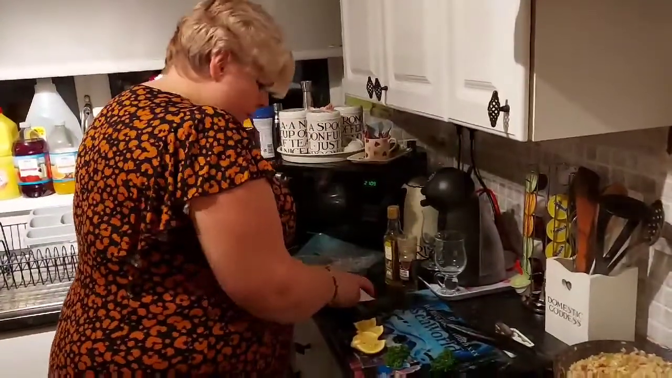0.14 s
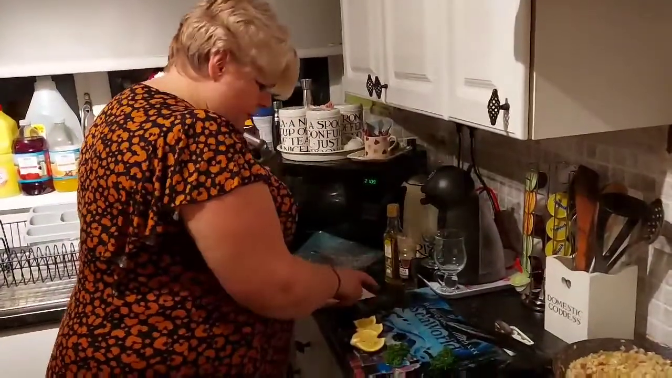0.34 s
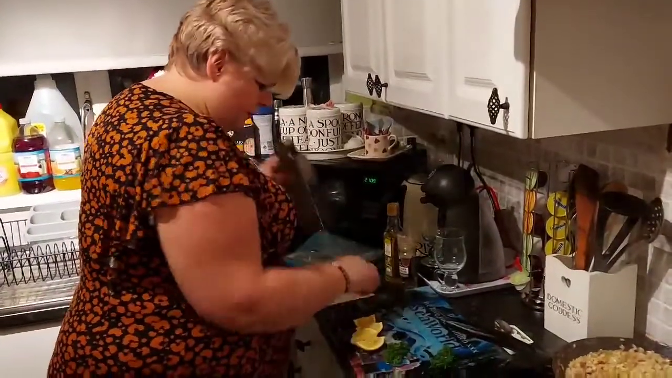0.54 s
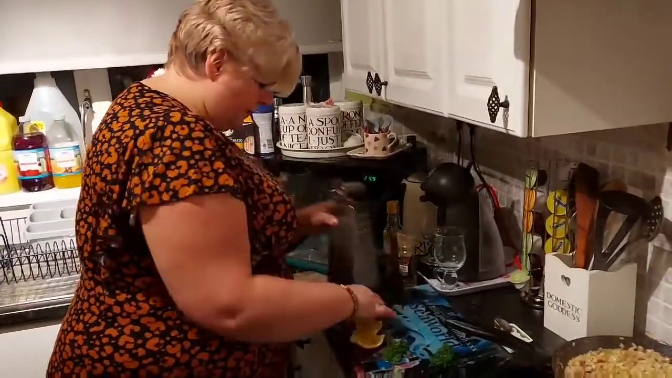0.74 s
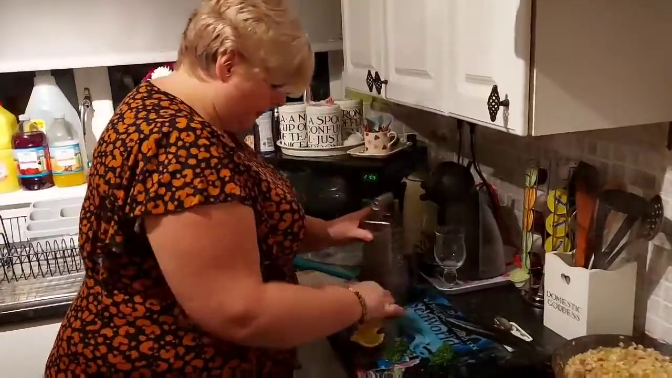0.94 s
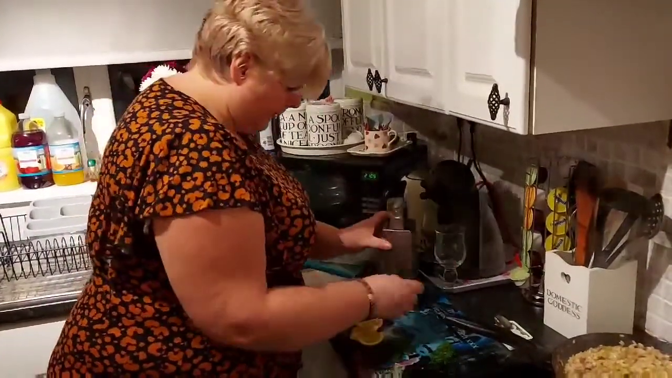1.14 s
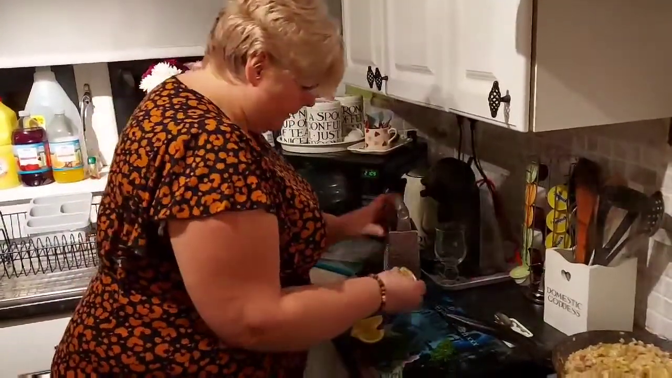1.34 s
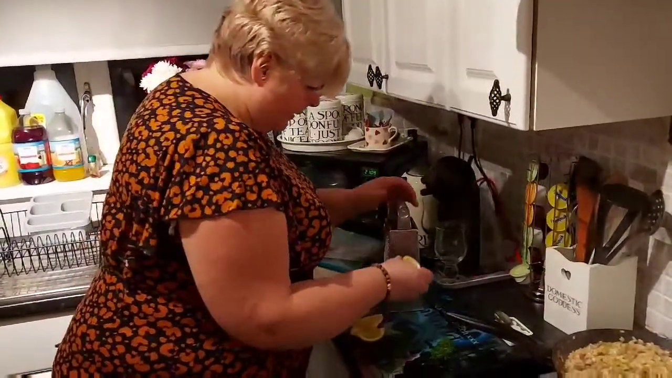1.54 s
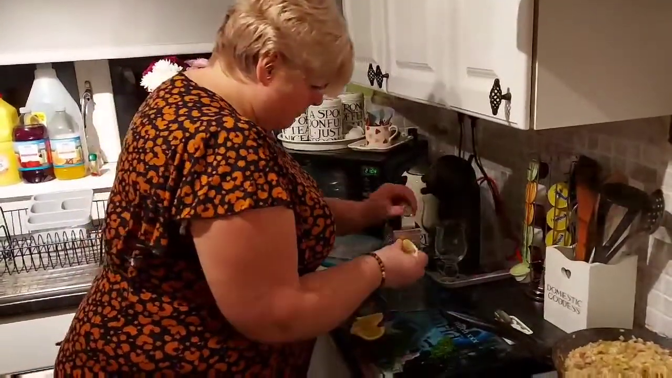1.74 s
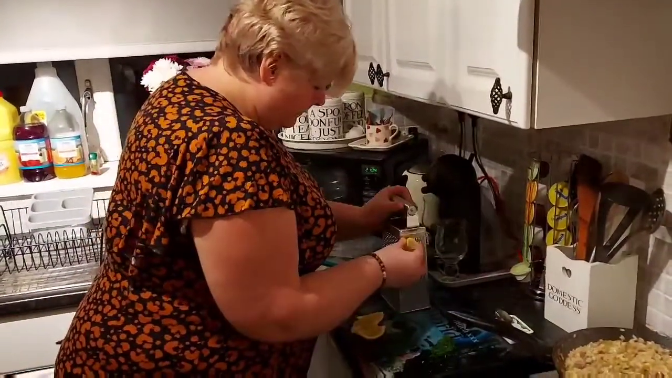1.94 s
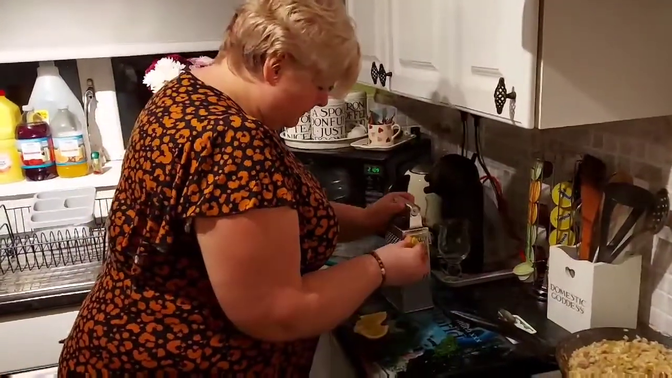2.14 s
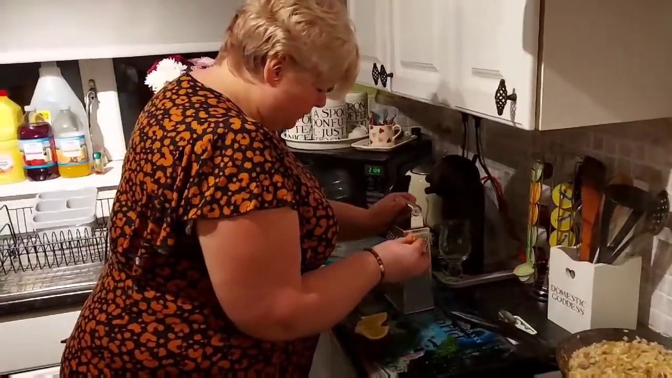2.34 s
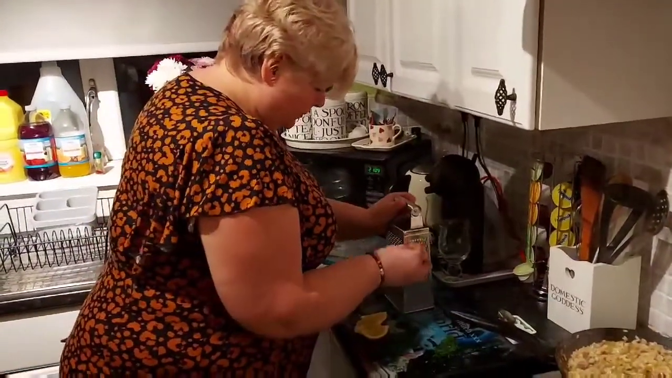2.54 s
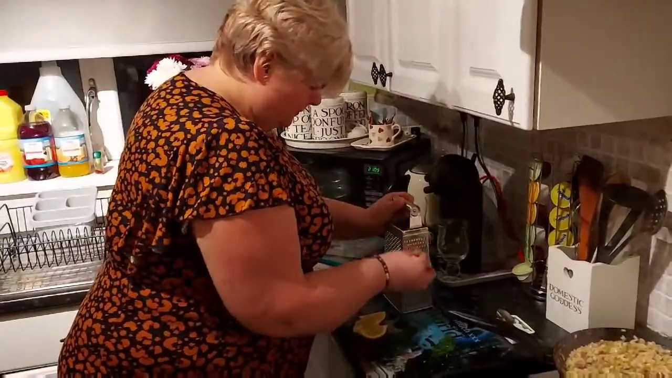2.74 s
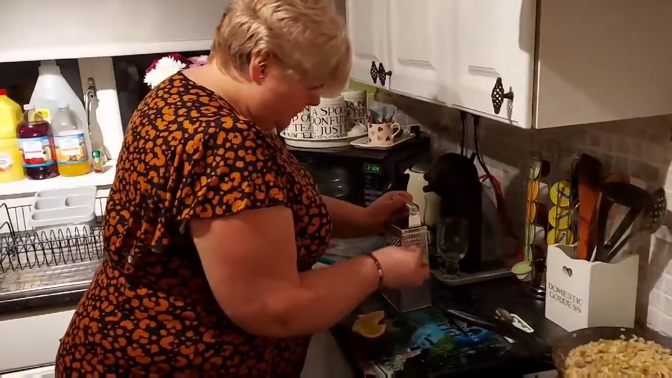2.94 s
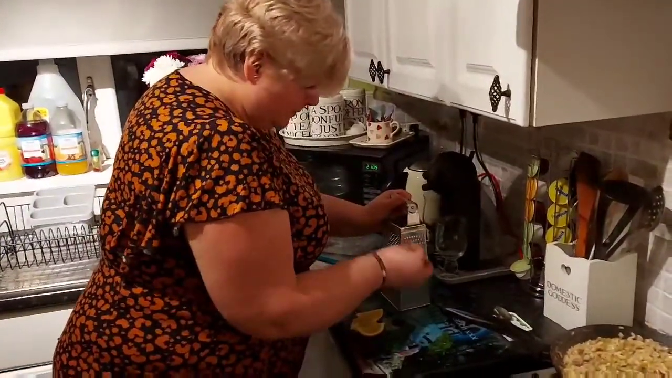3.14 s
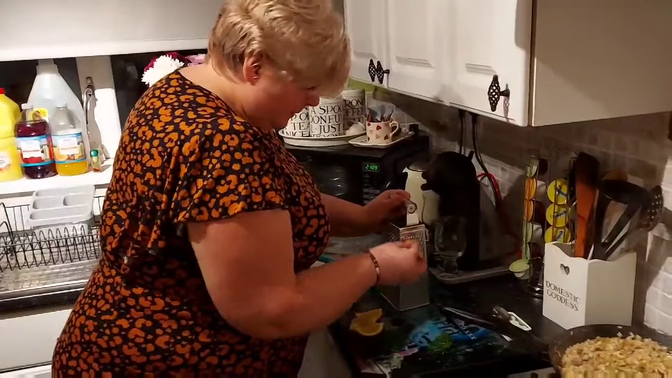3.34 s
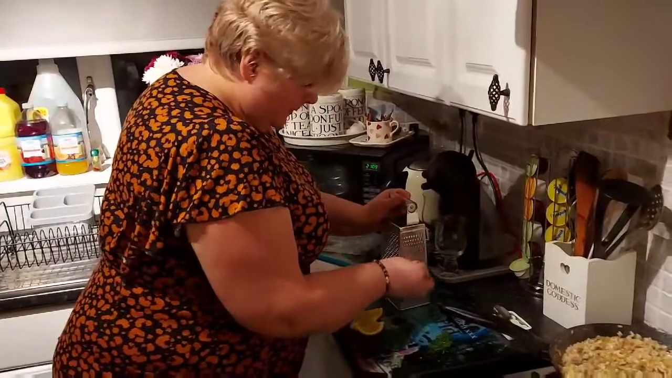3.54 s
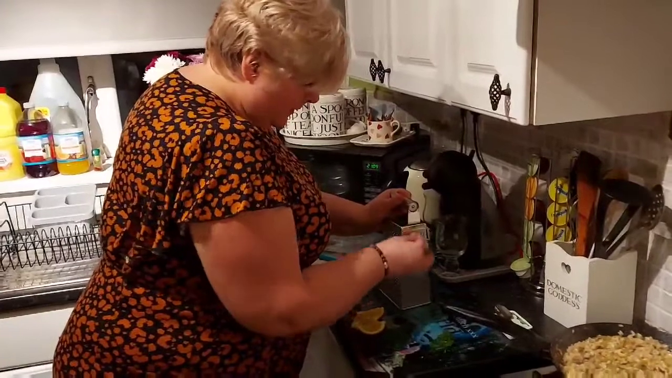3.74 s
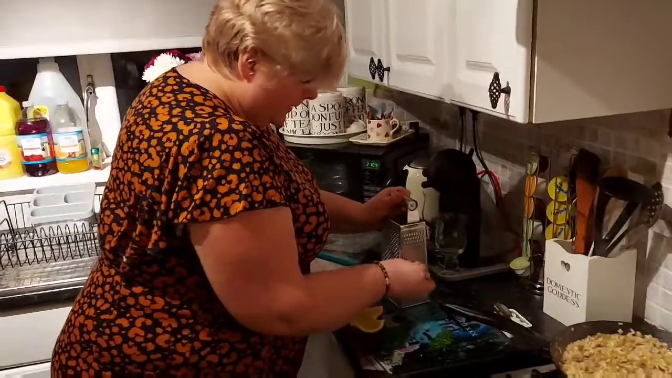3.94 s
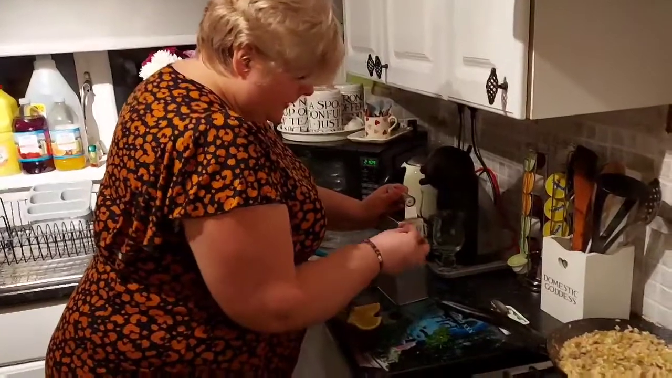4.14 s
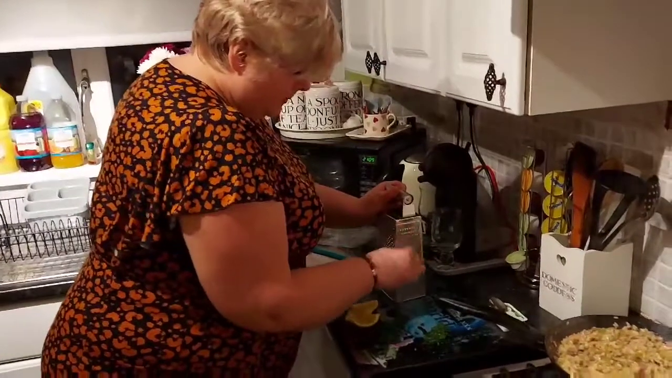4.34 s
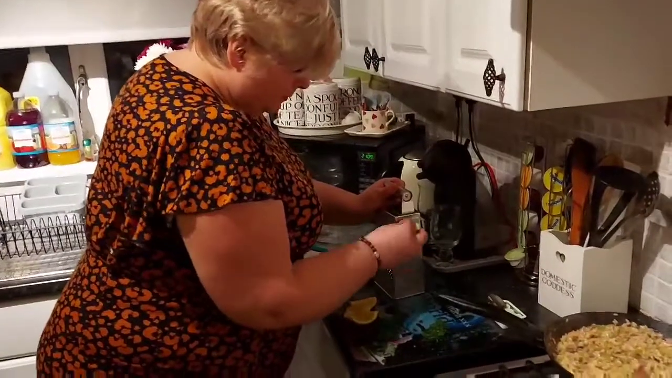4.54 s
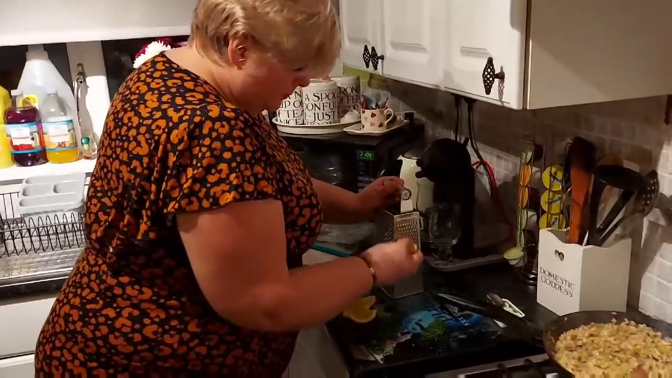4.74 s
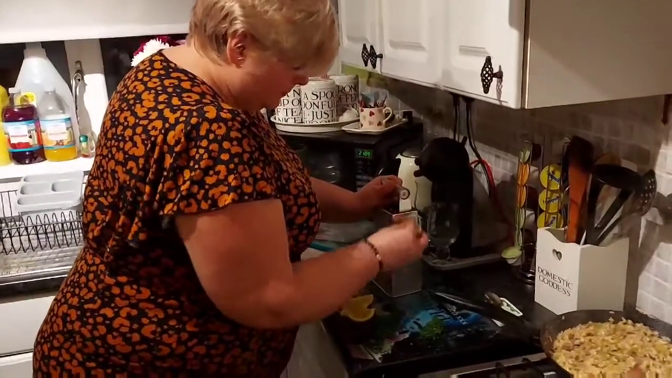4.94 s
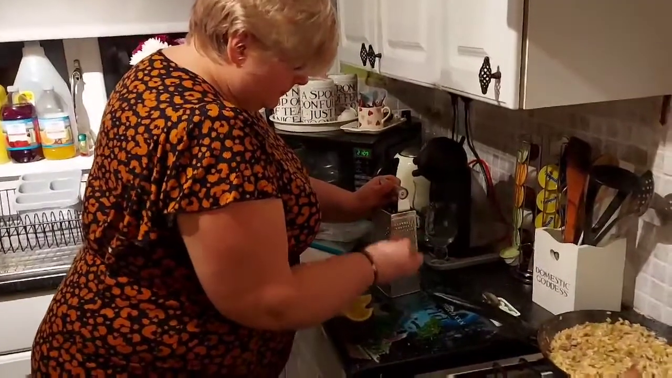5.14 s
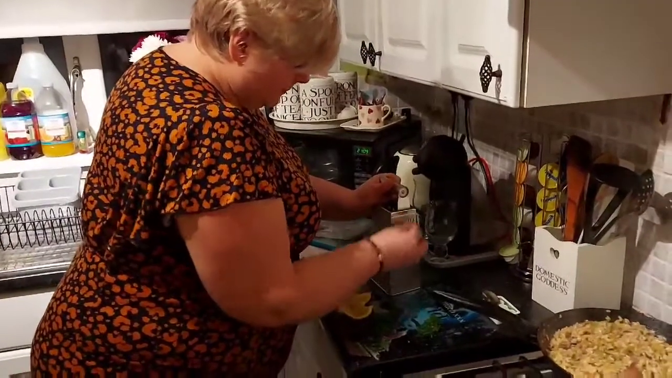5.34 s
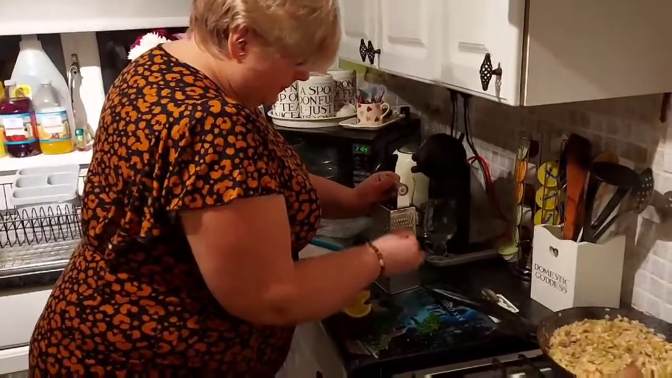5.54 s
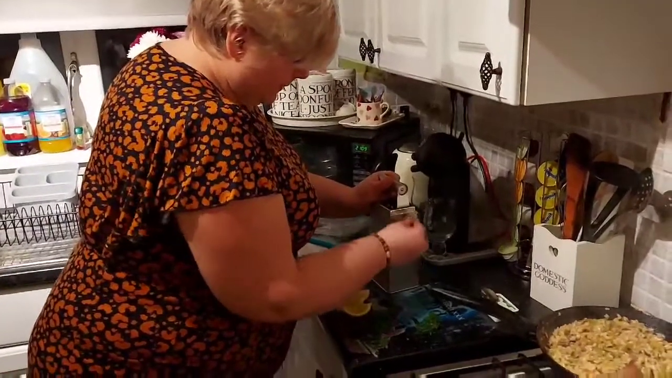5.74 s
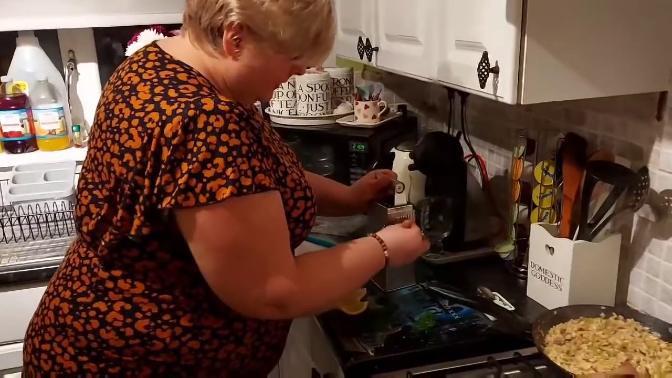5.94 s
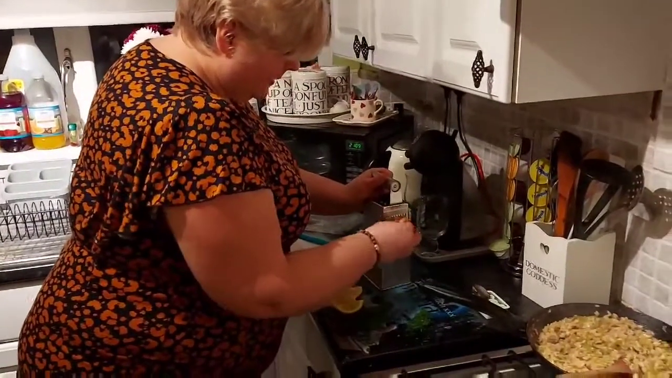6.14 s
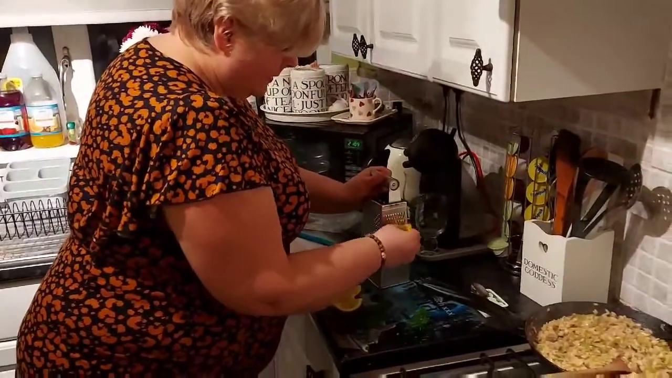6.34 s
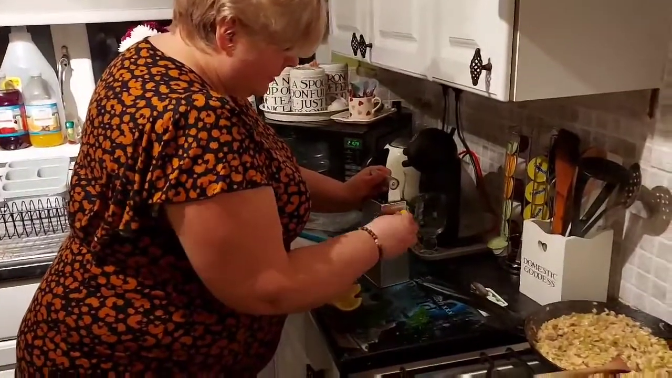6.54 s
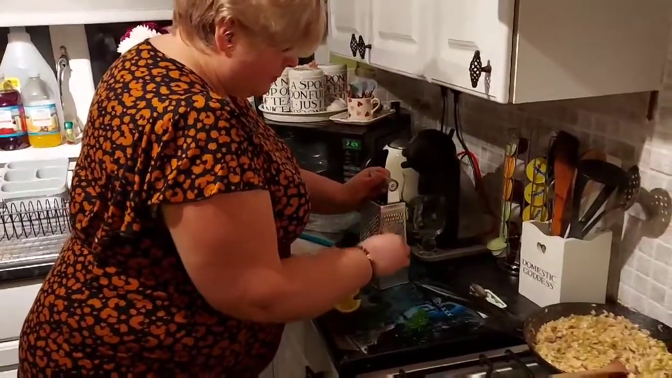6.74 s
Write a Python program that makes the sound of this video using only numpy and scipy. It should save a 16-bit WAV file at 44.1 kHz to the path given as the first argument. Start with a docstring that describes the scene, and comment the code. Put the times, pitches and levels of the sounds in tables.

```python
"""Lemon on a box grater

A steel box grater is stood on a kitchen counter and shuffled into place; a lemon is rubbed down it in eight strokes.
Tearing peel is thousands of tiny random snaps that ring the steel box; rim knocks and drags sound counter and steel.
Light clicks, a dull bump, low noise, a thin high hiss and mains hum surround them.
Sparse reflections and a decaying tail form the small, hard-walled kitchen."""
import sys
import numpy as np
from scipy import signal
from scipy.fft import rfft, irfft
from scipy.io import wavfile

SR = 44100
rng = np.random.default_rng(int(sys.argv[2]) if len(sys.argv) > 2 else 0)


def persist_wave(psi):
    """Save psi, clipped to +-1, as 16-bit WAV."""
    counts = np.round(np.clip(psi, -1, 1) * 32767).astype(np.int16)
    wavfile.write(sys.argv[1], SR, np.atleast_2d(counts).T)


N = 299412
TIME_S = np.arange(N) / SR

# Level columns are relative to each layer's mix gain; spectra are shapes, later normalised.
# Room tail decay: freq_hz, t60_s
ROOM_T60 = [(100, 0.54), (280, 0.42), (600, 0.34), (1400, 0.34), (3700, 0.31), (10000, 0.17)]
# Left-right likeness of the reflections: freq_hz, likeness (-1 to 1)
ROOM_LIKENESS = [(60, 0.72), (280, 0.79), (600, 0.55), (1300, -0.0083), (2800, 0.034), (13000, 0.0078)]
# Straight sound against the reflections: freq_hz, ratio_db
DIRECT_RATIO = [(100, -2.5), (300, -15.5), (700, -11.5), (1500, -12.5), (13000, -12.5)]

# Low room noise spectrum: freq_hz, shape_db
LOW_NOISE_SPECTRUM = [(15, -84), (25, -7), (108, -6), (157, -7.5), (523, -14.5), (781, -12.5), (884, -8),
                      (1000, -29), (1300, -70), (2200, -120)]
# High hiss spectrum: freq_hz, shape_db
HISS_SPECTRUM = [(900, -6), (1150, 4.5), (1450, 10), (1900, 2.5), (3100, 3.5), (3700, 8), (4400, 10),
                 (4900, 4), (5500, 9), (6300, 5), (10500, 6.5), (12000, 7.5), (12500, 13), (13300, -1)]
# High hiss level over time: time_s, relative_level_db
HISS_LEVEL = [(0, -57), (1, -59), (2.3, -58.5), (3.4, -59), (6.79, -59.5)]
# Left-right likeness of the background noise: freq_hz, likeness (-1 to 1)
NOISE_LIKENESS = [(60, 0.44), (180, 0.56), (520, 0.23), (1530, -0.11), (4510, -0.062), (13300, -0.003)]
# Mains hum: pitch_hz, rms_level_db
HUM_TONES = [(100, -79.5), (125, -81.5)]
LOW_NOISE_DB = -73

# Light clicks of small things touched: time_s, relative_level_db, hardness_corner_hz, chatter_s
TICK_BLOWS = [(.183, -43.5, 9000, 0.0014), (.561, -49, 2800, 0.011)]
# Dull bump as things are moved: time_s, relative_level_db, hardness_corner_hz, chatter_s
BUMP_BLOWS = [(.26, -51, 500, 0.027), (.282, -44, 1000, 0.016), (.322, -51, 800, 0.0073)]
# Worktop broad sound: freq_hz, shape_db
WORKTOP_SPECTRUM = [(40, -30), (100, -13), (160, -2), (230, -7.5), (400, -11), (650, -13.5), (1200, -16),
                    (3000, -17), (13000, -36)]
# Worktop modes: pitch_hz, width_hz, relative_level_db
WORKTOP_MODES = [(309, 3.2, 0), (250, 27, 3)]

# Rim strikes the counter: time_s, relative_level_db, hardness_corner_hz, chatter_s
RIM_KNOCKS = [(1.222, -23.5, 7700, 0.029), (1.334, -39, 2800, .007), (1.366, -28.5, 1600, 0.026),
              (1.462, -31.5, 13900, 0.031), (1.49, -31.5, 1870, .022), (2.007, -28, 1270, 0.0055),
              (2.096, -30, 1810, 0.0095), (2.215, -38, 1020, 0.0047)]
# Rim drags over the counter: start_s, press_s, release_s, relative_full_level_db, swell_db
RIM_DRAGS = [(1.325, 0.098, 0.13, -35, 4), (1.869, 0.257, .03, -38.5, 9.5)]
# Soft low thumps between strokes, as the lemon is set back on the box, and after the last:
# time_s, relative_level_db
SOFT_THUMPS = [(3.451, -54), (4.766, -53.5), (6.449, -63), (6.67, -62)]
# Counter broad sound: freq_hz, shape_db
COUNTER_SPECTRUM = [(30, -29), (85, -2), (200, -4), (280, 1), (500, -3), (800, 3.5), (1300, -0.5),
                    (1900, -1), (3200, -6.5), (5000, -7.5), (8000, -12.5), (13000, -7)]
ROCK_DELAY_S, ROCK_DB, ROCK_CORNER_HZ = 0.045, -10, 458  # duller thud as the box rocks back
THUMP_CORNER_HZ, THUMP_CHATTER_S = 262, 0.032
DRAG_ATTACK_DB_PER_S = 800
GRIP_DB_PER_OCTAVE, GRIP_FROM_HZ = 3.5, 340  # a hand round the box mutes its higher modes

# Lemon pushed down the teeth; the third stroke stalls and takes two pushes:
# start_s, attack_db_per_s, press_s, release_s, relative_full_level_db, swell_db, low_body_db, fizz_db
LEMON_PUSHES = [(2.734, 500, 0.09, 0.081, -42, 12, 0, -13),
                (3.144, 598, 0.08, 0.073, -34.5, 7.5, -3.5, -13),
                (3.522, 900, 0.042, 0.1, -44.5, 2, 0, -9.5),
                (3.67, 500, 0.03, 0.068, -39.5, -1.5, -1.5, -10),
                (3.978, 696, 0.14, 0.07, -33.5, 8, -3.5, -13),
                (4.426, 996, 0.13, 0.066, -31.5, 10.5, -4, -12.5),
                (4.873, 394, 0.092, 0.086, -36, 5, -2, -12), (5.267, 2200, 0.096, 0.073, -30, 9, -4.5, -14),
                (5.69, 508, 0.069, 0.081, -31, 11.5, -3.5, -14)]
# Peel catches in mid-stroke: time_s, relative_level_db
PEEL_SNAGS = [(3.662, -43), (4.063, -28.5), (4.5, -37), (4.54, -30), (5.731, -33)]
# Lemon brushes steel between strokes and after the last:
# time_s, relative_level_db, hardness_corner_hz, chatter_s
LEMON_BRUSHES = [(4.268, -62, 3080, 0.13), (6.057, -41.5, 11000, 0.024), (6.34, -58, 1840, 0.025),
                 (6.69, -59, 2180, 0.016)]
# Steel box modes: pitch_hz, width_hz, relative_level_db
BOX_MODES = [(90, 16, -2), (146, 10, 4), (269, 14, 6), (305, 22, 0), (415, 20, -4), (644, 20, 1),
             (908, 13, 9), (966, 14, -5), (1104, 14, 5), (1447, 16, 4), (1547, 14, 1), (1678, 14, 2),
             (1738, 14, 1), (1931, 16, 0), (2204, 16, 1), (2365, 16, 2), (2478, 14, 8), (2745, 16, 0),
             (2905, 20, 4), (3616, 16, 5), (4060, 16, 2), (4570, 16, 6)]
# Rasp broad sound: freq_hz, shape_db
RASP_SPECTRUM = [(30, -32), (70, -22), (130, -19.5), (200, -19.5), (285, -7), (360, -18), (480, -13.5),
                 (620, -6.5), (1000, -7), (2900, -4.5), (3400, -10.5), (4300, -7.5), (7000, -11.5),
                 (13200, -13.5)]
BITE_DB, BITE_LEAD_S = -2.5, 0.0034  # first catch, against the rasp that follows
BODY_DB_PER_S, BODY_RUN_OUT_DB = 2, 5.5  # low body grows down the face, more on release
FIZZ_DB_PER_DB, EASED_LIMIT_DB = 0.4727, 13.5  # fizz per dB under full pressure, up to the limit
SNAG_CORNER_HZ, SNAG_CHATTER_S = 9250, 0.0073  # hardness and length of every catch

EDGE_HZ = 13250


def gain_of(db):
    """Decibels to gain."""
    return 10 ** (np.asarray(db) / 20)


def evened(x):
    """Scales to rms 1."""
    return x / np.sqrt(np.mean(x ** 2) + 1e-20)


def read(points, hz):
    """Interpolates a table along a log-frequency axis."""
    point_hz, value = np.transpose(points)
    return np.interp(np.log(hz + 1), np.log(point_hz + 1), value)


def convolve(x, response):
    """Passes a sound through an impulse response, channel by channel."""
    return signal.fftconvolve(np.atleast_2d(x), np.atleast_2d(response), axes=1)[:, :N]


def colour(points, size=4096):
    """Minimum-phase impulse response with the given spectrum."""
    hz = abs(np.fft.fftfreq(size, 1 / SR))
    log_gain = np.log(gain_of(read(points, hz)))
    spectrum = np.exp(np.conj(signal.hilbert(log_gain)))
    return np.fft.ifft(spectrum).real[:size // 2]


def lowpass(x, hz, order=2):
    """Causal low-pass at a corner frequency."""
    return signal.sosfilt(signal.butter(order, min(hz, SR / 2 - 1), fs=SR, output="sos"), x)


def below(x, hz):
    """Low-pass without delay."""
    return signal.sosfiltfilt(signal.butter(2, hz, fs=SR, output="sos"), x)


def pair(two, likeness):
    """Blends two unrelated noises into a left and a right of given likeness."""
    a, b = rfft(two)
    same = np.clip(read(likeness, np.fft.rfftfreq(two.shape[1], 1 / SR)), -1, 1)
    mid = np.sqrt((1 + same) / 2) * a
    side = np.sqrt((1 - same) / 2) * b
    return irfft([mid + side, mid - side], two.shape[1])


def kitchen(early_db, early_t60_s):
    """Room response: straight sound, early reflections from counter, tiles and cupboards, and a tail."""
    t = TIME_S[:SR // 2]
    shape = (2, 2, len(t))
    taps = rng.choice([-1., 1.], shape) * (rng.random(shape) < 4000 / SR)  # 4000 per second
    # the tail decays at its own rate in each band
    hz, age_s, bands = signal.stft(pair(taps[0], ROOM_LIKENESS), SR, nperseg=256)
    decay = gain_of(-60 * age_s / read(ROOM_T60, hz)[:, None])
    tail = signal.istft(bands * decay, SR)[1][:, :len(t)]
    tail *= 1 - np.exp(-t / 0.0052)
    early = pair(taps[1], ROOM_LIKENESS) * gain_of(-60 * t / early_t60_s)
    reflected = evened(evened(tail) + gain_of(early_db) * evened(early)) / np.sqrt(len(t))
    straight = np.zeros_like(reflected)
    straight[[0, 1], [2, 0]] = 1  # the right ear is two samples nearer
    hz, ratio_db = np.transpose(DIRECT_RATIO)
    total_db = 10 * np.log10(1 + gain_of(ratio_db) ** 2)  # the two power shares add up to one
    direct = convolve(straight, colour(np.c_[hz, ratio_db - total_db]))
    diffuse = convolve(reflected, colour(np.c_[hz, -total_db]))
    return (direct + diffuse)[:, :len(t)]


def body(spectrum, modes, ring_db, room):
    """Response of one spot: room plus decaying modes of random weight, through a broad colour."""
    t = TIME_S[:room.shape[1]]
    ring = np.zeros_like(room)
    for hz, width_hz, db in modes:
        phase = rng.standard_normal((2, 1)) * hz / 2000  # high modes reach the two ears out of step
        spot_gain = gain_of(db + ring_db + 2 * rng.standard_normal())
        height = spot_gain * 2 * np.pi * width_hz / SR
        ring += height * np.exp(-np.pi * width_hz * t) * np.cos(2 * np.pi * hz * t + phase)
    sheet = colour(spectrum)
    return convolve(room + ring, sheet / np.linalg.norm(sheet))


def spots(force, per_s, count):
    """The contact wanders: crossfades the force from one spot of the steel to the next."""
    away = (TIME_S * per_s - np.arange(count)[:, None]) % count - 1
    return force * np.cos(np.pi / 2 * np.clip(away, -1, 1))


def snaps(per_s, spread_db, clump_db, clump_hz):
    """Tiny fractures of uneven size whose strength swells in clumps."""
    size = gain_of(spread_db * np.minimum(rng.exponential(1, N), 4))
    clumps = gain_of(clump_db * evened(lowpass(rng.standard_normal(N), clump_hz)))
    sign = rng.choice([-1, 1], N)
    occurs = rng.random(N) < per_s / SR
    return evened(size * clumps * sign * occurs)


def blows(rows, click, rise):
    """A click plus chatter rising over `rise` times its decay; softer contacts lose treble."""
    out = np.zeros(N)
    t = TIME_S[:SR // 6]
    for start_s, db, corner_hz, chatter_s in rows:
        envelope = np.exp(-t / chatter_s) * (1 - np.exp(-t / (rise * chatter_s)))
        force = rng.standard_normal(len(t)) * envelope
        force[0] += click
        force = lowpass(force, corner_hz)
        force *= gain_of(db) * np.sqrt(chatter_s * SR / 2) / np.linalg.norm(force)
        part = out[round(start_s * SR):][:len(t)]
        part += force[:len(part)]
    return out


def push(start_s, press_s, release_s, swell_db, attack_db_per_s):
    """Push pressure in dB under its top: quick attack, steady swell, rounded 20 dB fall in release_s."""
    age_s = TIME_S - start_s
    attack = attack_db_per_s * np.minimum(age_s, 0)
    swell = swell_db * (np.clip(age_s / press_s, 0, 1) - 1)
    release = -20 * (np.maximum(age_s - press_s, 0) / release_s) ** 2
    return attack + swell + release


def background():
    """Coloured low room noise, a thin high hiss and appliance hum as steady sines."""
    low, high = (evened(convolve(pair(rng.standard_normal((2, N)), NOISE_LIKENESS), colour(points)))
                 for points in (LOW_NOISE_SPECTRUM, HISS_SPECTRUM))
    hum = sum(np.sqrt(2) * gain_of(db) * np.sin(2 * np.pi * (hz * TIME_S + rng.random()))
              for hz, db in HUM_TONES)
    hiss_db = np.interp(TIME_S, *np.transpose(HISS_LEVEL)) + 3
    return gain_of(LOW_NOISE_DB) * low + gain_of(hiss_db) * high + hum


def ticks():
    """Small hard things give thin clicks with the bass removed."""
    force = gain_of(5.0) * blows(TICK_BLOWS, click=4.0, rise=0.05)
    return convolve(force - below(force, 2200), kitchen(early_db=1, early_t60_s=0.037))


def bump():
    """A soft worktop thud excites a faint low ring."""
    force = gain_of(-7) * blows(BUMP_BLOWS, click=3.9, rise=0.19)
    room = kitchen(early_db=9.5, early_t60_s=0.089)
    return convolve(force, body(WORKTOP_SPECTRUM, WORKTOP_MODES, ring_db=5.5, room=room))


def box_contacts():
    """Every rim knock, the rocking back that follows it, and the soft low thumps."""
    rocks = [(s + ROCK_DELAY_S, db + ROCK_DB, ROCK_CORNER_HZ, chatter_s) for s, db, _, chatter_s in RIM_KNOCKS]
    thumps = [(s, db, THUMP_CORNER_HZ, THUMP_CHATTER_S) for s, db in SOFT_THUMPS]
    return list(RIM_KNOCKS) + rocks + thumps


def box_on_counter():
    """The box lands, rocks, judders and thumps; counter and steel sound together, high modes damped by the grip."""
    slips = snaps(per_s=2000, spread_db=2.5, clump_db=1.5, clump_hz=60)
    level = sum(gain_of(db + push(start_s, press_s, release_s, swell_db, DRAG_ATTACK_DB_PER_S))
                for start_s, press_s, release_s, db, swell_db in RIM_DRAGS)
    judder = level * evened(lowpass(slips, 6400, order=1))
    contacts = blows(box_contacts(), click=4.3, rise=0.065)
    force = gain_of(-9.0) * judder + gain_of(-8.0) * contacts
    gripped = [(hz, width_hz, db - GRIP_DB_PER_OCTAVE * max(np.log2(hz / GRIP_FROM_HZ), 0))
               for hz, width_hz, db in BOX_MODES]
    return sum(convolve(part, body(COUNTER_SPECTRUM, gripped, ring_db=-1.5,
                                   room=kitchen(early_db=4, early_t60_s=0.032)))
               for part in spots(force, per_s=17, count=5))


def strokes():
    """Gains of rasp, low body and fizz: all follow pressure, with relatively more fizz at a light touch."""
    gains = np.zeros((3, N))
    for start_s, attack_db_per_s, press_s, release_s, db, swell_db, low_body_db, fizz_db in LEMON_PUSHES:
        pressure = push(start_s, press_s, release_s, swell_db, attack_db_per_s)
        touching = pressure > -80
        pressure = pressure[touching]
        past_top_s = np.clip(TIME_S[touching] - start_s - press_s, -press_s, release_s)
        run_out = np.maximum(past_top_s, 0) / release_s
        low_body = low_body_db + BODY_DB_PER_S * past_top_s + BODY_RUN_OUT_DB * run_out
        fizz = fizz_db + FIZZ_DB_PER_DB * np.minimum(-pressure, EASED_LIMIT_DB)
        gains[:, touching] += gain_of(db + np.array([pressure, pressure + low_body, pressure + fizz]))
    return gains


def catches():
    """The peel catches as each push bites, and now and then on the way down."""
    bites = [(start_s - BITE_LEAD_S, db - swell_db + BITE_DB)
             for start_s, _, _, _, db, swell_db, _, _ in LEMON_PUSHES]
    return [(s, db, SNAG_CORNER_HZ, SNAG_CHATTER_S) for s, db in bites + list(PEEL_SNAGS)]


def treble_modes(width_hz, db, count):
    """The punched sheet adds a crowd of short, quickly damped modes in the treble."""
    pitches_hz = np.exp(rng.uniform(np.log(3000), np.log(12000), count))
    return [(hz, width_hz, db) for hz in pitches_hz]


def grating():
    """Teeth tear peel in snaps split into low body, rasp and fizz; these and the catches ring the steel."""
    rasp_gain, body_gain, fizz_gain = strokes()
    teeth = snaps(per_s=2400, spread_db=2.0, clump_db=1.5, clump_hz=142)
    low = below(teeth, 960)
    high = teeth - below(teeth, 4400)
    middle = teeth - low - high
    force = gain_of(2.0) * rasp_gain * middle
    force += gain_of(7.5) * body_gain * low
    force += gain_of(8.0) * fizz_gain * high
    force += gain_of(-0.55) * blows(catches() + list(LEMON_BRUSHES), click=3.5, rise=0.25)
    modes = list(BOX_MODES) + treble_modes(width_hz=44.0, db=2.5, count=32)
    return sum(convolve(part, body(RASP_SPECTRUM, modes, ring_db=0.0,
                                   room=kitchen(early_db=8.5, early_t60_s=0.047)))
               for part in spots(force, per_s=14, count=4))


def scene():
    """Everything that sounds in the kitchen."""
    return background() + ticks() + bump() + box_on_counter() + grating()


def record(dry):
    """The recorder's steep band limit."""
    band_limit = signal.firwin(601, EDGE_HZ, window=("kaiser", 7), fs=SR)
    return signal.oaconvolve(dry, band_limit[None], "same")


dry = scene()
out = record(dry)
persist_wave(out)
```